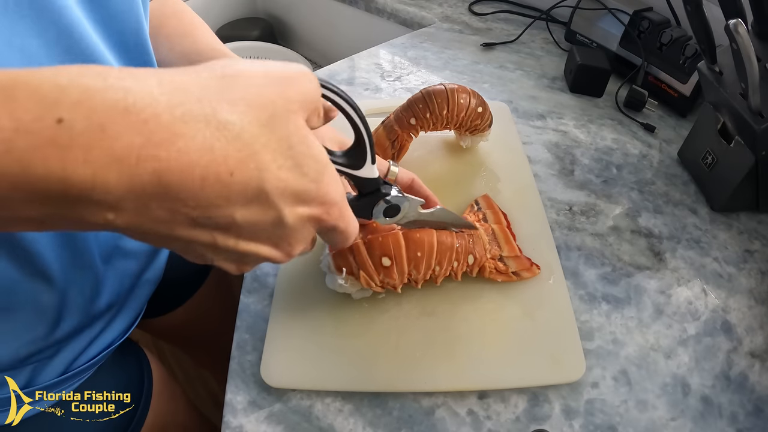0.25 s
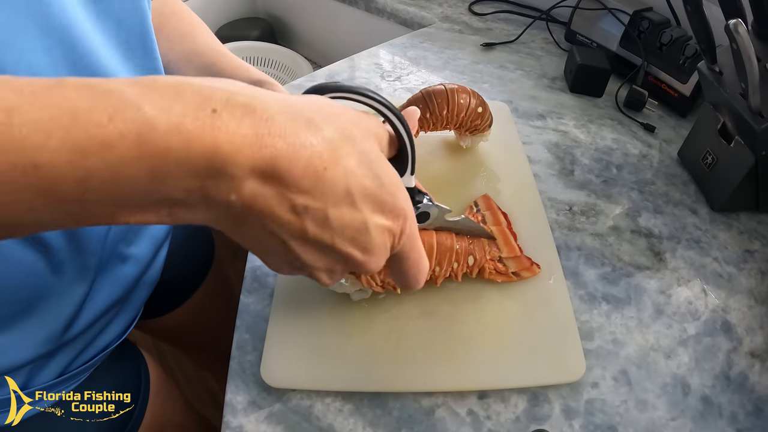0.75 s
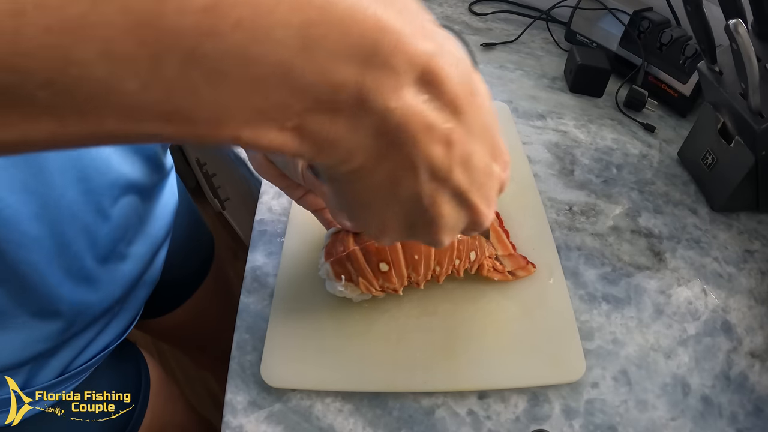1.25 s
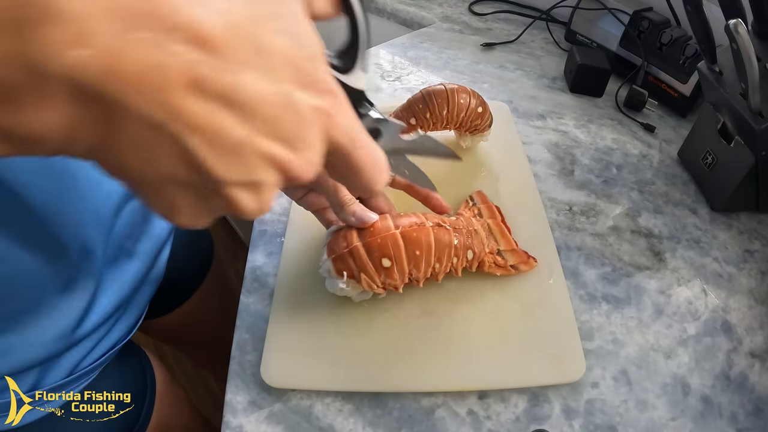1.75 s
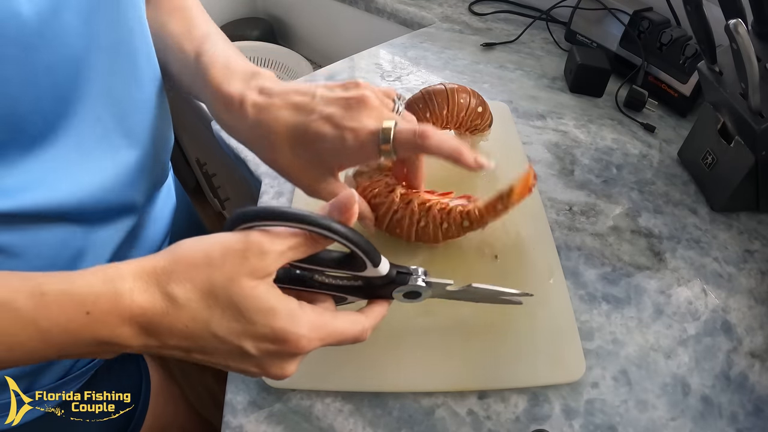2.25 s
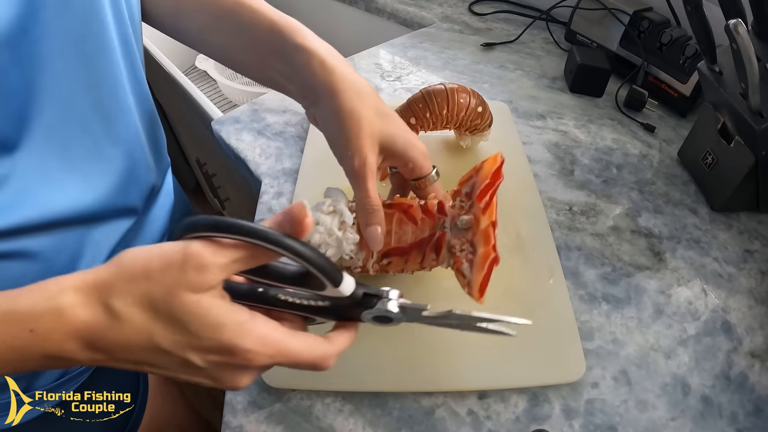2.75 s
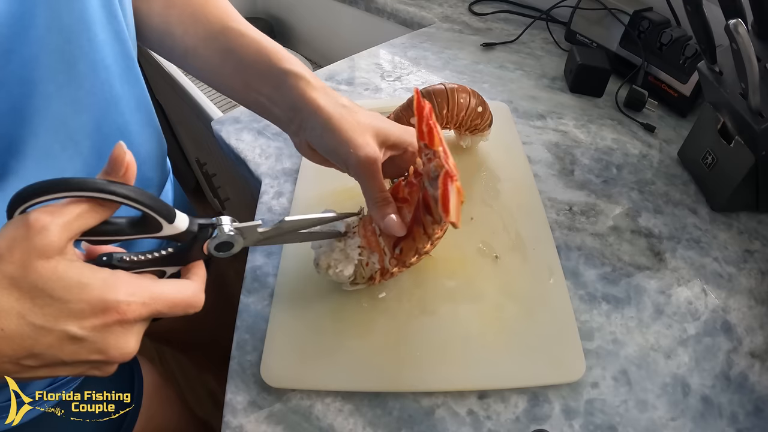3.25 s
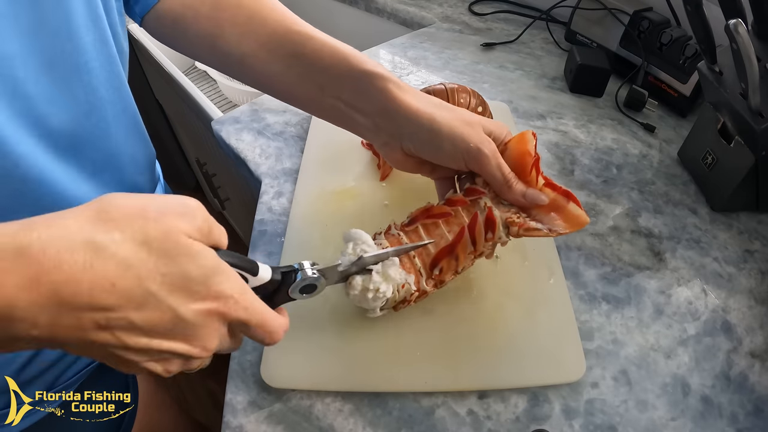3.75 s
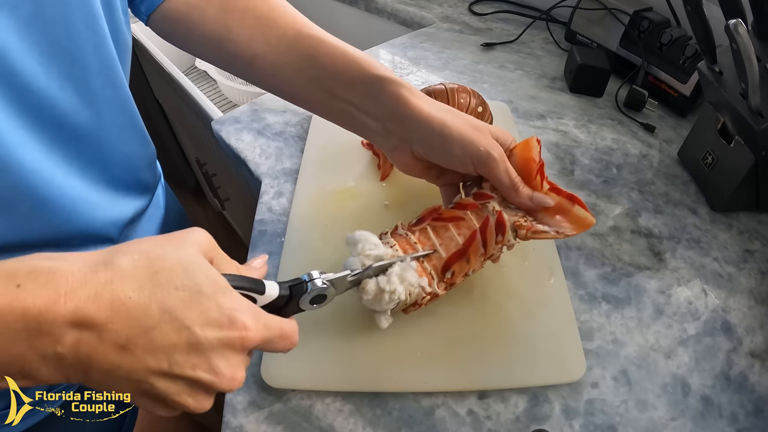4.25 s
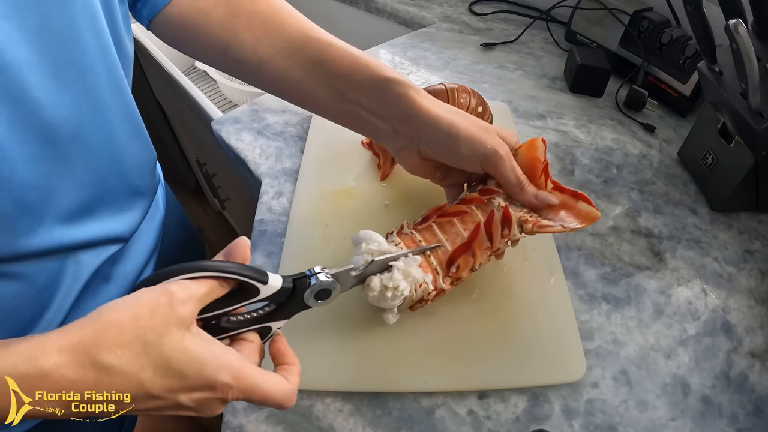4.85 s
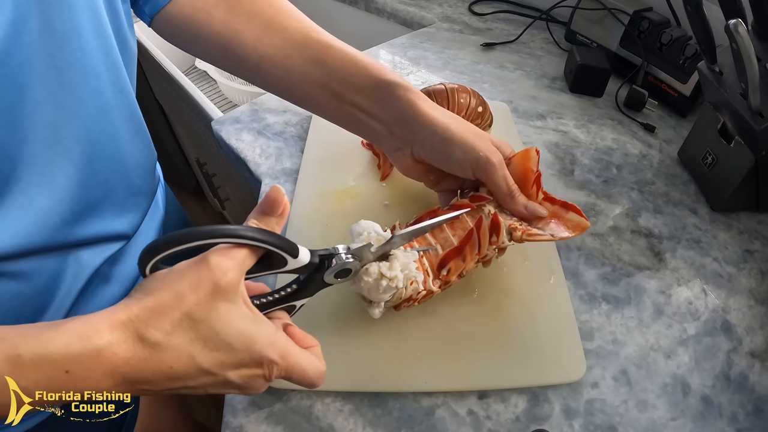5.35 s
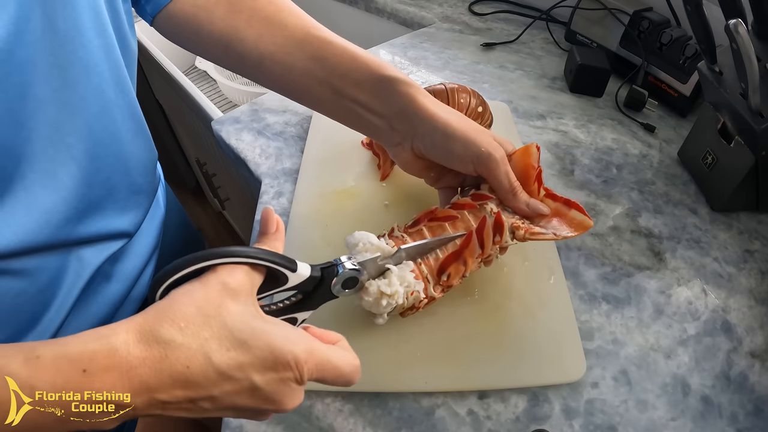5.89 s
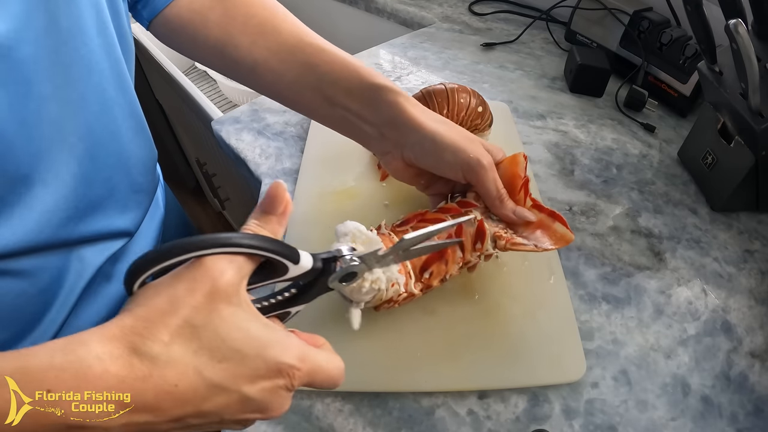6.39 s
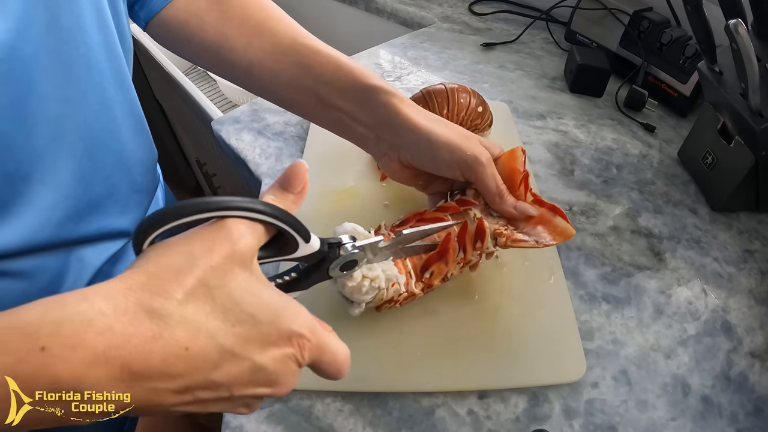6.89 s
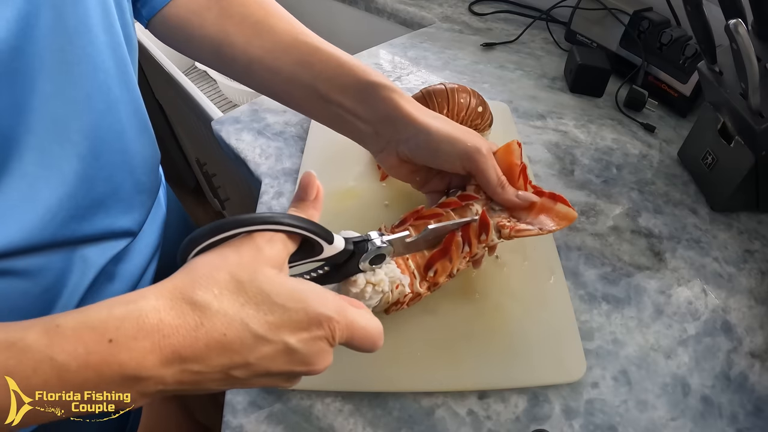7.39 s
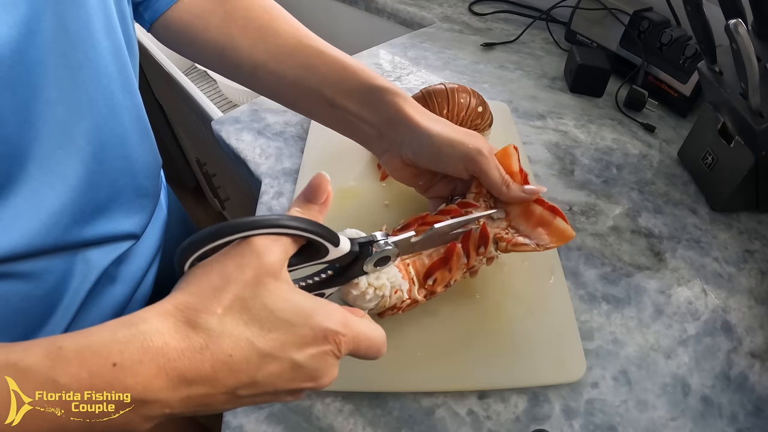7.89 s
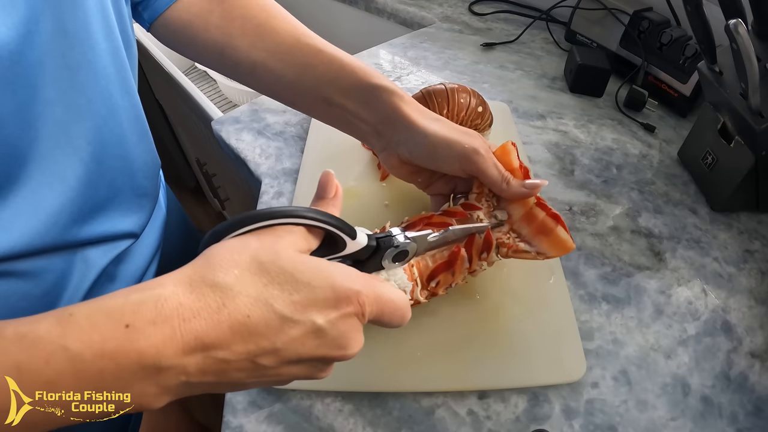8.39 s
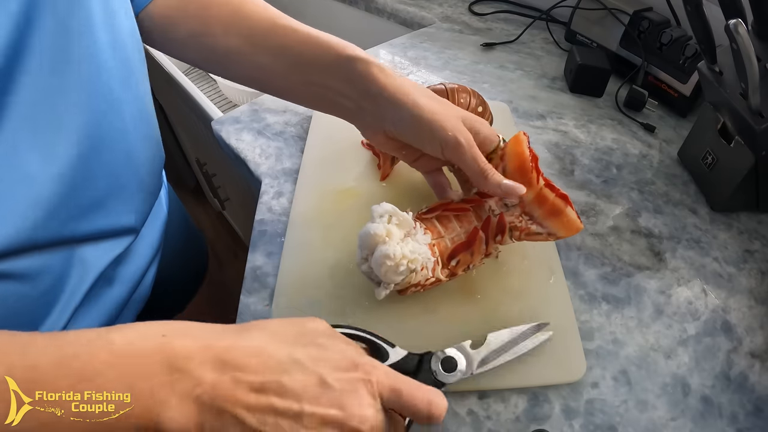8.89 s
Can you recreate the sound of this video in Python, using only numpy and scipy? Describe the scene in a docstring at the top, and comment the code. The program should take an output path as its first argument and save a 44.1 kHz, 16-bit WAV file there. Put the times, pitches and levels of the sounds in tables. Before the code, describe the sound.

Close, brittle snaps and ratcheting creaks of shell being cut, dull plastic board thuds, wet handling ticks, faint refrigerator hum in a hard room.

```python
"""Hard cracks and creaks of a lobster shell, cut with kitchen shears close to a small camera.
Noise bursts ring freed pieces of shell; uneven slips ring the shell gripped by the blades.
Knocks set off the modes of a plastic board, steel rings, wet ticks and rubs follow the hands.
Decaying noise tails make the hard kitchen; a refrigerator and other low hums waver under the room noise,
and early on a far engine glides upward in three harmonics."""
import sys
import numpy as np
from scipy import signal
from scipy.fft import rfft, irfft, next_fast_len
from scipy.io import wavfile
from scipy.ndimage import uniform_filter1d

SR = 44100
rng = np.random.default_rng(int(sys.argv[2]) if len(sys.argv) > 2 else 0)


def volts(x):
    """Linear amplitude factor 10**(x/20) for a level x in dB, scalar or array-like."""
    e = np.asarray(x, float) / 20
    return 10 ** e


def output_pcm(signal):
    """Save a mono or channel-first signal as 16-bit PCM at the path in sys.argv[1].

    Samples are clipped to [-1, 1] before scaling.
    """
    pcm = np.clip(np.atleast_2d(signal).T, -1, 1) * 32767
    wavfile.write(sys.argv[1], SR, np.round(pcm).astype(np.int16))


N = 402633

# fingers and blades moving on the wet shell: (time [s], level [dB])
HANDLING_LEVELS = [(0, -34.5), (.3, -58), (.89, -65), (1.32, -63), (2.09, -62.5), (2.75, -84), (2.95, -57),
                   (3.15, -76), (3.9, -78), (4.29, -56.5), (4.81, -64), (5.44, -47), (6.2, -69.5),
                   (6.8, -85), (7.04, -61), (7.55, -52), (8.2, -58.5), (8.93, -78), (9.13, -38.5)]


def evened(x):
    """Scales to rms 1."""
    return x / np.sqrt(np.mean(x ** 2) + 1e-20)


def read(points, hz):
    """Reads a table on a log frequency axis."""
    f, value = np.transpose(points)
    return np.interp(np.log(hz + 1), np.log(f + 1), value)


def add(mix, s, sound):
    """Mixes a sound in at second s."""
    part = mix[max(round(s * SR), 0):][:len(sound)]
    part += sound[:len(part)]


def above(x, hz):
    """High-pass of 12 dB per octave."""
    return signal.sosfilt(signal.butter(2, hz, "high", fs=SR, output="sos"), x)


def resonate(x, hz, width):
    """A two-pole resonance of gain 1, width in Hz."""
    return signal.lfilter(*signal.iirpeak(hz, hz / width, SR), x)


def glide(x, hz, width):
    """A moving resonance: shift down to zero, smooth, shift back."""
    turn = np.exp(2j * np.pi * np.cumsum(hz) / SR)
    r = np.exp(-np.pi * width / SR)
    return 2 * (turn * signal.lfilter([1 - r], [1, -r], x / turn)).real


def wander(rate_hz):
    """Slow irregular drift of rms 1: sines up to rate_hz, the slower ones stronger."""
    t = np.arange(0, N, 256) / SR
    rates = np.geomspace(rate_hz / 20, rate_hz, num=24)
    slow = sum(np.sin(2 * np.pi * (f * t + rng.random())) / np.sqrt(f) for f in rates)
    return np.interp(np.arange(N) / SR, t, evened(slow))


def crack(peak_db, hz, wide_db):
    """A snap and a splinter of noise, partly through the resonance of the freed piece of shell.

    Also returns what the room gets: a smooth colour with a narrower ring, same energy."""
    over_db = max(peak_db, 0)
    # the splinter decay varies, and shortens for the loudest cracks
    decay_ms = 1.39 * volts(1.5 * rng.standard_normal() - 0.27 * over_db)
    t = np.arange(900) / SR
    burst = rng.standard_normal(len(t)) * np.exp(-t * 1000 / max(decay_ms, .1))
    burst[0] += 2.63  # the snap
    rung = resonate(resonate(burst, hz, hz / 2.1), hz, hz)
    sound = above(evened(rung) + volts(wide_db) * evened(burst), 700)
    sound = volts(peak_db) * sound / abs(sound).max()

    click = 1. * (t == 0)
    sharpness = 3.5 * volts(0.21 * over_db)  # the loudest cracks ring sharper
    ring = evened(resonate(click, hz, hz / sharpness))
    smooth = above(ring + volts(wide_db + 3.5) * evened(click), 730)
    return sound, evened(smooth) * np.std(sound)


def ticks():
    """Small cracks at random moments, as loud as the hands are busy."""
    per_s, over_db, spread_db, centre_hz = 16, 18, 5, 3400  # over_db: above the handling level
    when, size, pitch = rng.random((400, 3)).T
    s = np.cumsum(-np.log(when + 1e-9)) / per_s
    handling_db = np.interp(s, *np.transpose(HANDLING_LEVELS))
    peak_db = handling_db + over_db - spread_db * np.log(size + .05)
    return [(a, b, centre_hz * (.5 + c), 0, -5) for a, b, c in zip(s, peak_db, pitch) if a < N / SR]


def add_cracks(near, sends):
    """The breaking shell, large and small, each crack also thrown into the room 2 ms later."""
    # shell cracks: (time [s], peak [dB], shell resonance [Hz], wide splinter against resonance [dB],
    # share thrown into the room [dB])
    shell_cracks = [(.0547, -23.5, 1770, -1, 10), (.075, -12.5, 2700, 2, -3), (.1108, -7, 2830, 0, -11),
                    (.2267, -23, 1950, 1, 0), (.243, -22, 3500, 7, -12), (.2816, -29, 2000, -8, -13),
                    (.321, -25.5, 2480, 3, 3.5), (.4293, -22.5, 1850, 2, -1), (.4609, -15, 1750, 4, -6),
                    (.4671, -11, 1930, -28.5, -5.5), (.4788, -0.5, 2980, 1, -8), (.542, -23, 4000, -2, -4),
                    (.5528, -15, 1988, -11.5, 6), (.559, -13.5, 1990, -4, 5), (.567, -14.5, 4100, 2, 2),
                    (.632, -14, 3530, 5, -8), (.638, -11.5, 2330, 0, -7), (.655, -20, 4400, 0, -12),
                    (.6769, -22, 1980, 4, -10), (.684, -22, 4470, -2, -13), (.7217, -21.5, 1930, -2, 4),
                    (.74, -21, 4580, 5, -25), (.769, -20, 4300, 4, -7), (.7738, -6, 1950, -0.5, -2.5),
                    (.7816, 4.5, 3785, -2.5, -8), (.851, -23, 1550, 7, -9), (.9216, -28, 1420, -4, -17),
                    (.9778, -11.5, 2050, -3, -6), (.9788, -3, 1030, 3, -15), (1.125, -31, 5500, 10, -10),
                    (1.148, -26, 4000, 8, -13), (1.1551, -4.5, 2130, 4, -8),
                    (1.1788, 1.5, 3150, -0.5, -4.5), (1.2481, -13.5, 1980, -1, -0.5),
                    (1.263, -26, 2600, 3, -8), (1.287, -12, 2080, -4, -10), (1.312, -2.5, 3670, -6.5, -7),
                    (1.3155, -0.5, 4860, -3, -17), (1.3288, 6, 3650, 1, -2.5), (1.3676, 6.5, 2730, 10, -8),
                    (1.3834, -3, 3420, 9, -5), (1.4335, -2.5, 2900, -22, -9.5), (1.4415, -5, 3330, 0, -24),
                    (1.6145, -13.5, 2030, -4, -3), (1.6771, -29, 1880, 7, 7), (1.72, -19, 2600, 5.5, 6.5),
                    (1.7488, -24, 3300, -16, -13), (1.7534, -3.5, 2030, -5, -11),
                    (1.7604, -4, 2750, -11, -15), (1.7701, -12.5, 1660, -9, -1.5),
                    (1.8208, -6, 1360, 35, -12), (1.9086, -27, 1230, 5, 4), (2.33, -9, 1790, -13, -2.5),
                    (2.335, -6.5, 3400, 10, -0.5), (2.339, -8, 1320, -1, -0.5),
                    (2.451, -6.5, 1180, -26, -29), (2.6379, -15, 1460, -4.5, 0.5),
                    (2.95, -32, 5740, 2, -2.5), (4.0133, -33.5, 4010, 6, 2.5), (4.0764, -36, 3500, -2, 4),
                    (4.088, -2.5, 2800, 13, 3), (4.0981, 11.5, 3170, 32, -2), (4.0999, -10, 1278, -6, -4),
                    (4.2134, -11, 4190, 22, -7), (4.309, -30, 4360, -6, 9), (4.3298, -8, 4400, 4, -10),
                    (4.3316, 15, 4500, 0.5, -1), (4.8028, -22, 4200, 9, -1.5), (4.9182, -29, 2855, 4.5, -1),
                    (5.008, -32.5, 1900, -2, -1.5), (5.0755, 0, 2380, 0.5, -7), (5.0775, 6, 3300, 12, -6),
                    (5.0848, 8, 3280, 10.5, -6), (5.1724, -17.5, 2410, -4, -11),
                    (5.2454, -11.5, 3130, 2.5, -6.5), (5.3422, -21.5, 3300, -5, 3),
                    (5.3718, -18, 2890, -8, -12), (5.778, -21.5, 5040, 9, -8), (5.8654, -26, 3220, 6.5, -6),
                    (5.8853, -28.5, 3880, 8, 4), (5.9029, -3, 3860, 0, -15), (5.914, -11, 3260, 7, -12),
                    (5.9204, -2.5, 3340, 21, -15), (5.9381, -4.5, 3300, 12, 3), (6.0033, -17, 2230, 15, 1),
                    (6.0435, 0, 2500, 0.5, -1), (6.0458, -1.5, 3700, 0, 6), (6.0478, 6, 5780, -9, -2),
                    (6.127, 1, 3420, 14, -2), (6.1727, 1.5, 3500, 10, -9), (6.2838, -7, 1110, 21, -9),
                    (6.8683, -14.5, 1170, 0.5, 7), (6.957, -19.5, 4470, 9, -4.5),
                    (6.9845, -22, 1560, 8, -1), (7.038, -17.5, 1040, 0, -2), (7.0723, -16.5, 2750, 0, 7.5),
                    (7.3475, -28, 3400, 0, -1), (7.3655, -13, 3270, -3.5, -9),
                    (7.3954, -7.5, 3670, -9, -10.5), (7.4211, -12.5, 3650, -9, -12),
                    (7.4804, -16, 4030, -11, -15), (7.5106, -23, 3940, -10, -18),
                    (7.5682, -27.5, 2960, -12, -8), (7.5863, -26, 3150, -7, -10), (7.5991, -17, 2710, 7, 2),
                    (7.6224, -16.5, 3360, 15, 4), (7.645, -9, 4240, 7, -12), (7.6625, -3.5, 3000, 33, 6.5),
                    (7.6695, 11, 5260, 16, -7.5), (7.6735, 4.5, 4170, -0.5, -1.5),
                    (7.9074, -27, 3950, 1, -14), (7.9319, -5, 3540, 0.5, -9.5),
                    (7.9385, -11, 3760, -9, -24), (8.1712, -13, 2750, 1.5, -2), (8.3277, -17, 3020, 7, 2),
                    (8.3495, -8, 3550, -19, -1), (8.3537, -2, 2240, -1.5, -5),
                    (8.3547, -1.5, 6400, -11, -5.5), (8.522, -14, 3100, -11, -17),
                    (8.529, -18, 2780, -12, 2), (8.5453, -16, 3680, -3, -4.5),
                    (8.5522, -18, 3160, -13, -10), (8.588, -9.5, 1710, 6, -4), (8.6242, -14, 2710, 14, -1),
                    (8.6302, -17.5, 2900, 5.5, -4.5), (8.659, -20, 3200, 16, -11),
                    (8.8256, -24.5, 2140, 23, 0.5), (8.8393, -22.5, 1560, 20, 0),
                    (8.8891, -5, 1770, 0.5, -2), (8.8935, 0, 2520, 12, 1), (8.8974, 5.5, 1770, 11, -4),
                    (8.997, -19, 2780, -5, -3), (9.055, -29, 2570, -5, -2), (9.1024, -9, 1110, -36, -16)]
    for k, (s, peak_db, hz, wide_db, send_db) in enumerate(list(shell_cracks) + ticks()):
        sound, smooth = crack(peak_db, hz, wide_db)
        add(near, s, sound)
        add(sends[k % 3], s + .002, volts(send_db) * smooth)


def creak(rows, rough):
    """Stick and slip: uneven clicks ring the gripped shell; rough slips carry more rubbing noise."""
    # shell gripped by the blades, before the stiffness factor: (resonance [Hz], width [Hz], level [dB])
    gripped = [(850, 1300, 2), (1720, 1400, 6.5), (2750, 350, 13), (3300, 1000, 12), (4260, 720, 15),
               (4900, 1400, 9), (6270, 2800, 6.5), (10150, 7400, -11)]
    brisk_per_s = 400
    s, *columns = np.transpose(rows)
    t = np.arange(s[0], s[-1], 1 / SR)
    level_db, rate, stiff = (np.interp(t, s, c) for c in columns)
    jitter, size, noise = rng.standard_normal((len(t), 3)).T
    uneven_rate = rate * np.exp(rough * evened(uniform_filter1d(jitter, size=100)))
    turns = np.cumsum(uneven_rate) / SR
    slips = np.diff(np.floor(turns), prepend=0) * volts((3 + 4 * min(rough, .3)) * size)
    rubbing = .5 * rough ** 2 * np.sqrt(rate / brisk_per_s) * noise
    drive = slips / np.sqrt(rate / SR) + rubbing  # slips keep their level whatever the rate

    # slow slips drive the high resonances less: 3.5 dB per octave of rate and of pitch over 3700 Hz
    slow = np.minimum(np.log2(rate / brisk_per_s), 0)
    shell = np.zeros(len(t))
    for k, (hz, width, db) in enumerate(gripped):
        gain = volts(db + 3.5 * slow * max(np.log2(hz / 3700), 0))
        rung = glide(glide(drive, hz * stiff, width), hz * stiff, 2 * width)
        shell += (-1) ** k * gain * rung
    return s[0], volts(level_db) * evened(above(shell, 400))


def strokes():
    """Blades dragged through the shell: they bite, the force sags and slips slow down, they let go."""
    # (start [s], length [s], level [dB], slips [per s], stiffness [factor on the resonances],
    # roughness [0-1])
    drags = [(.001, 0.14, -41, 930, 0.98, 0.25), (0.547, 0.11, -41.5, 390, .75, 0.25),
             (1.743, 0.041, -24.5, 840, 0.76, 0.21), (2.088, 0.075, -43.5, 500, 0.84, .6),
             (5.731, 0.077, -44.5, 162, 0.84, 0.42), (5.935, 0.039, -23, 620, 0.93, 0.16),
             (8.525, 0.065, -36, 180, 0.54, 0.22), (8.589, 0.099, -47, 280, 0.63, 0.03)]
    sag_db, slowing = -1.5, 0.97
    creaks = []
    for start, length, level_db, per_s, stiff, rough in drags:
        bite, go = min(.015, length / 3), min(.012, length / 3)
        end, sagged_db, slowed = start + length, level_db + sag_db, slowing * per_s
        rows = [(start, level_db - 3.5, per_s, stiff), (start + bite, level_db, per_s, stiff),
                (end - go, sagged_db, slowed, stiff), (end, sagged_db - 13.5, slowed, stiff)]
        creaks.append((rows, rough))
    return creaks


def strains():
    """The shell strains ever louder until it gives: a swell that stops at the break."""
    # (break time [s], length [s], level at the break [dB], stiffness [factor on the resonances])
    swells = [(0.786, 0.2, -38.5, 0.67), (1.739, 0.043, -35, .87), (4.336, 0.018, -17.5, 2.1),
              (7.038, 0.021, -24, 1.36), (7.677, 0.034, -23, 1.28), (7.934, 0.019, -23, 1.1),
              (8.359, 0.019, -17, 1.15)]
    rise_db, per_s = 18.5, 640
    return [([(end - length, level_db - rise_db, per_s, stiff), (end, level_db, per_s, stiff)], .15)
            for end, length, level_db, stiff in swells]


def long_cuts():
    """Three long cuts along the shell, with changing force and slip rate."""
    # one list for each cut: (time [s], level [dB], slips [per s])
    cut_paths = [
        [(5.394, -35, 237), (5.41, -35, 335), (5.424, -35, 124), (5.47, -42, 95), (5.497, -34.5, 150),
         (5.51, -33.5, 290), (5.532, -39, 440), (5.545, -56, 350), (5.556, -39, 315), (5.59, -38, 240),
         (5.62, -40, 110), (5.69, -63, 66)],
        [(6.876, -40, 520), (6.9, -26, 490), (6.935, -33.5, 570), (6.948, -43, 510)],
        [(7.045, -32.5, 730), (7.072, -30, 760), (7.1, -28.5, 710), (7.126, -25.5, 890), (7.145, -26, 920),
         (7.195, -24.5, 1100), (7.204, -31, 1100), (7.222, -26, 530), (7.232, -24.5, 330), (7.243, -31, 290)],
    ]
    # stiffness of the shell in each cut: [factor on the resonances]
    cut_stiffness = [.84, 1.12, 1.03]
    # unevenness of the slips in each cut: [0-1]
    cut_roughness = [.12, .055, .075]
    return [([(*row, stiff) for row in path], rough)
            for path, stiff, rough in zip(cut_paths, cut_stiffness, cut_roughness)]


def add_creaks(near, sends):
    """All the stick and slip of the blades, with some of it thrown into the room."""
    for rows, rough in strokes() + strains() + long_cuts():
        s, sound = creak(rows, rough)
        add(near, s, sound)
        add(sends[0], s, volts(-10.5) * sound)


def knock(peak_db, contact_ms, ring):
    """A half-sine push sets off the board modes, each a little off from blow to blow."""
    # modes of the board, before blow-to-blow spread and ring factor: (pitch [Hz], level [dB], t60 [s])
    board = [(215, -34.5, 0.046), (380, -6.5, 0.059), (566, -24, .08), (694.5, 4, 0.11), (828, 3, 0.048),
             (1133, 6, 0.036), (1440, -5, 0.045), (1730, 5, 0.055)]
    t = np.arange(8000) / SR
    modes = np.zeros(len(t))
    for hz, db, t60 in board:
        off = rng.standard_normal()
        decay_db = -60 * t / (t60 * max(ring, .1))
        modes += volts(db + 2.5 * off + decay_db) * np.sin(2 * np.pi * hz * (1 + .03 * off) * t)
    push = np.sin(np.pi * np.clip(t[:200] * 1000 / contact_ms, 0, 1))
    sound = above(np.convolve(modes, push), 300)  # a thin board radiates no bass
    return volts(peak_db) * sound / abs(sound).max()


def add_knocks(near, sends):
    """Shell and shears knock the board, echoed about 2 ms later."""
    # (time [s], peak [dB], contact time [ms], ring [factor on the decay, at least 0.1])
    board_knocks = [(0.471, -21.5, 0.41, 0.62), (0.46, -20.5, 0.22, 0.33), (0.651, -21, 1.54, 0.13),
                    (0.725, -23.5, 0.6, 0.65), (0.745, -19.5, 0.41, .4), (0.762, -30, 0.35, 0.5),
                    (0.771, -13, 0.45, 0.78), (0.783, -14, 0.31, 0.3), (0.85, -26.5, 0.63, 0.37),
                    (0.921, -25.5, 0.48, 0.47), (0.9785, -23, 0.12, 0.89), (1.25, -23, 0.34, 0.58),
                    (1.337, -27, 0.26, 0.42), (1.368, -19, 0.2, 0.61), (2.33, -3.5, 0.87, 0.21),
                    (2.338, -14, 0.9, 1), (2.45, -4, 0.15, 0.41), (2.481, -28, 0.54, 0.54),
                    (2.538, -29.5, .25, 1), (2.638, -11, 0.98, 0.69), (2.648, -17, 0.24, 0.68),
                    (3.269, -31.5, 0.66, 0.5), (3.325, -30.5, 0.51, 0.75), (4.089, -20, 0.32, 0.5),
                    (4.098, -8.5, 0.36, 0.56), (4.106, -7.5, 1.63, 0.74), (4.11, -11, 1.2, 0.49),
                    (4.329, -11.5, 1.6, 0.17), (4.99, -31, 0.54, 0.34), (5.01, -33, 0.38, 0.36),
                    (5.086, -28, 0.15, 0.35), (5.112, -30, 0.56, .4), (5.15, -22.5, 0.28, 0.68),
                    (5.285, -27, 0.41, .3), (5.343, -20.5, 0.22, 0.25), (5.904, -27.5, 0.47, 0.48),
                    (5.939, -23, 1, 0.83), (5.963, -22, 0.36, 0.22), (6.046, -15, 0.93, 0.085),
                    (6.23, -8, 0.73, 0.38), (6.289, -15.5, 0.93, 0.59), (6.868, -20.5, 0.31, 0.27),
                    (7.228, -31, 0.73, 0.96), (7.669, -11.5, 0.4, 0.5), (7.673, -27, 0.24, 0.23),
                    (7.366, -24.5, 0.14, 0.39), (8.171, -26.5, 0.12, 0.44), (8.352, -16, 0.18, 0.23),
                    (8.89, -19, 0.22, 1), (8.895, -6, 0.92, 0.4), (9.102, -12.5, 0.37, 0.6)]
    for k, (s, *blow) in enumerate(board_knocks):
        sound = knock(*blow)
        add(near, s, sound)
        add(sends[k % 3], s + 0.002068, volts(-5.0) * sound)


def shears(peak_db):
    """The steel rings briefly in its own modes."""
    # modes of the shears: (pitch [Hz], level [dB], t60 [s])
    steel = [(562, -1.5, 0.12), (1150, -1.5, 0.041), (1770, -4.5, 0.067), (2640, -17, .08),
             (3150, -9.5, 0.072)]
    t = np.arange(8000) / SR
    sound = sum(volts(db - 60 * t / t60) * np.sin(2 * np.pi * hz * t) for hz, db, t60 in steel)
    return volts(peak_db) * sound / abs(sound).max()


def add_shears(near, sends):
    """The shears are laid down and rock on the board: a row of steel rings."""
    # (time [s], peak [dB])
    rocking = [(8.89, -6.5), (8.919, -17), (8.955, -28), (8.98, -23.5), (9.055, -26)]
    for s, peak_db in rocking:
        sound = shears(peak_db)
        add(near, s, sound)
        add(sends[1], s + 0.00194, volts(-7) * sound)


def add_blades(near, sends):
    """The blades meet and ring: one short decaying sine."""
    # (time [s], peak [dB])
    meetings = [(.978, -14)]
    hz, t60 = 5700, .011
    t = np.arange(4000) / SR
    for s, peak_db in meetings:
        sound = volts(peak_db - 60 * t / t60) * np.sin(2 * np.pi * hz * t)
        add(near, s, sound)
        add(sends[2], s, volts(-9.0) * sound)


def handling(per_s=900, spread_db=2.5, rub=0.31):
    """Tiny wet ticks over a soft rub."""
    draw, noise = rng.random((N, 2)).T, rng.standard_normal(N)
    size = volts(-spread_db * np.log(draw[1] + 0.0022))
    wet_ticks = (draw[0] < per_s / SR) * size * np.sign(noise)
    sound = resonate(evened(wet_ticks) + rub * noise, 2000, 3500)
    level_db = np.interp(np.arange(N) / SR, *np.transpose(HANDLING_LEVELS))
    return volts(level_db) * evened(sound)


def kitchen(sends, early_db=11.5, early_t60=0.091):
    """Three noise tails: quick echoes off board and counter, then the room dying band by band."""
    # decay of the hard room: (frequency [Hz], t60 [s])
    room_decay = [(250, 0.83), (1000, 0.68), (4000, 0.62), (10000, 0.56)]
    hz, t, z = signal.stft(rng.standard_normal((3, SR)), SR, nperseg=128)
    late = volts(-60 * t / read(room_decay, hz)[:, None])
    early = volts(early_db - 60 * t / early_t60)
    tails = signal.istft(z * np.hypot(late, early), SR, nperseg=128)[1][:, :SR]
    tails = tails / np.linalg.norm(tails, axis=1, keepdims=True)
    return signal.fftconvolve(sends, tails, axes=1)[:, :N].sum(0)


def engine(first_db=-54, third_db=-14):
    """A far engine speeds up: three firing harmonics glide up, the first steady, the upper two swelling."""
    # second harmonic; the third follows it, third_db against it: (time [s], level [dB])
    swelling = [(0.602, -63), (.85, -51.5), (1.22, -36), (1.36, -56), (1.6, -46.5), (1.8, -45.5),
                (2.0, -39), (2.1, -55.5), (2.25, -47), (2.45, -43)]
    s, level_db = np.transpose(swelling)
    t = np.arange(s[0], s[-1], 1 / SR)
    hz = 119.2 + 31.5 * (t - 1)  # rises by 31.5 Hz per s
    a = 2 * np.pi * np.cumsum(hz) / SR
    first = volts(first_db) * signal.windows.tukey(len(t), .5) * np.sin(a)
    upper = volts(np.interp(t, s, level_db)) * (np.sin(2 * a) + volts(third_db) * np.sin(3 * a))
    return s[0], np.sqrt(2) * (first + upper)


def low_hums(waver_db=3.0, drift=0.00202):
    """Refrigerator shaft orders, a separate hum near 109 Hz and the mains tone, each wavering in level."""
    # whole multiples are orders of the compressor shaft, 2.5 is the separate hum:
    # (multiple of the shaft's turning rate, level [dB])
    hums = [(2.5, -58), (4, -59.5), (5, -59), (6, -42), (7, -59), (8, -58), (13, -61.5), (14, -58),
            (16, -56)]
    # mains tone: (frequency [Hz], level [dB])
    mains_hz, mains_db = (59.6, -55)
    shaft_hz = 43.51 * (1 + drift * wander(3))
    turns = np.cumsum(shaft_hz) / SR
    out = np.zeros(N)
    for k, db in hums:
        out += volts(db + waver_db * wander(9)) * np.sin(2 * np.pi * (k * turns + rng.random()))
    mains = np.sin(2 * np.pi * mains_hz * np.arange(N) / SR)
    out += volts(mains_db + 2.5 * wander(1.9)) * mains
    return np.sqrt(2) * out


def air(patchy_db=1.0):
    """Room noise: coloured noise with drifting patches in time and frequency."""
    # (frequency [Hz], level [dB per Hz])
    room_noise = [(25, -100), (45, -95), (63, -67), (110, -71), (140, -77), (300, -71.5), (450, -77.5),
                  (640, -77), (850, -81.5), (1300, -84.5), (2000, -91), (4000, -103), (7000, -104),
                  (16000, -104)]
    frames, hz = N // 256 + 5, np.fft.rfftfreq(1024, 1 / SR)
    a, b, patches = rng.standard_normal((frames, 513, 3)).T
    patches = uniform_filter1d(patches, size=6, axis=0)
    patches = evened(uniform_filter1d(patches, size=20, axis=1))
    shape = volts(read(room_noise, hz))
    z = (a + 1j * b) * shape[:, None] * volts(patchy_db * patches)
    noise = signal.istft(z, nperseg=1024, noverlap=768)[1][:N]
    return evened(noise) * np.sqrt((shape ** 2).sum() * hz[1])


def scene():
    """Near sounds, their kitchen tails and the background, alike in both channels."""
    near, sends = np.zeros(N), np.zeros((3, N))  # one send for each tail
    add_cracks(near, sends)
    add_creaks(near, sends)
    add_knocks(near, sends)
    add_shears(near, sends)
    add_blades(near, sends)
    add(near, *engine())
    mono = near + kitchen(sends) + handling() + low_hums() + air()
    return np.array([mono, mono])


def microphone(x):
    """The microphone behind its port: a minimum-phase colour."""
    # (frequency [Hz], level [dB])
    port_colour = [(4500, 0), (6800, -5.5), (8000, -14.5), (8900, -26.5), (9600, -19), (10800, -10),
                   (12000, -18.5), (13500, -26), (14300, -45), (17000, -69.5)]
    log_gain = np.log(volts(read(port_colour, np.fft.rfftfreq(4096, 1 / SR))))
    log_gain = np.r_[log_gain, log_gain[-2:0:-1]]
    taps = np.fft.ifft(np.exp(np.conj(signal.hilbert(log_gain)))).real[:2048]
    return signal.oaconvolve(x, taps)[:N]


def ducking(x, knee_db, ratio, back_db_s, smooth_s, start_db=0):
    """Gain that falls with power over the knee and creeps back at a steady rate."""
    r = np.exp(-1 / (smooth_s * SR))
    power_db = 10 * np.log10(signal.lfilter([1 - r], [1, -r], x ** 2) + 1e-12)
    back = np.arange(N) * back_db_s / SR
    duck_db = np.maximum(ratio * (power_db - knee_db), 0)
    duck_db[0] = start_db
    duck_db = np.maximum.accumulate(duck_db + back) - back
    return volts(-signal.lfilter([1 - r], [1, -r], duck_db))


def faint_stereo(mid):
    """A faint stereo difference, a quarter turn from mid, growing in the treble."""
    # side against mid: (frequency [Hz], level [dB])
    side_levels = [(100, -45.5), (900, -49.5), (2000, -46), (4500, -38.5), (7000, -24.5), (9000, -20.5),
                   (10500, -16.5), (12000, -8), (15000, -2)]
    size = next_fast_len(N)
    gain = volts(read(side_levels, np.fft.rfftfreq(size, 1 / SR)))
    side = irfft(1j * rfft(mid, size) * gain, size)[:N]  # 1j makes the quarter turn
    return np.array([mid + side, mid - side])


def band_limit(x):
    """A steep low-pass at the top of the band."""
    return signal.sosfilt(signal.butter(12, 16450, fs=SR, output="sos"), x)


def record(dry):
    """Port colour, quick treble limiter, slow gain control low at first, soft clipping, faint stereo."""
    mid = microphone(dry.mean(0))
    mid = above(above(mid, 48), 48)  # the recorder cuts rumble
    treble = above(mid, 1100)
    limiter = ducking(treble, knee_db=-14.5, ratio=0.83, back_db_s=116.5, smooth_s=0.0041)
    mid = mid - treble * (1 - limiter)
    mid = mid * ducking(mid, knee_db=-18.5, ratio=0.31, back_db_s=4.5, smooth_s=0.0042, start_db=5.5)
    mid = mid / (1 + mid ** 4) ** .25  # soft clipping
    pair = faint_stereo(mid)
    # output filter: a gentle low-pass, then a steep one
    pair = signal.sosfilt(signal.butter(2, 11500, fs=SR, output="sos"), pair)
    steep = signal.firwin(255, 16300, window=("kaiser", 8), fs=SR)
    pair = signal.oaconvolve(pair, steep[None], "same")
    return band_limit(volts(0.22) * pair)


dry = scene()
out = record(dry)
output_pcm(out)
```